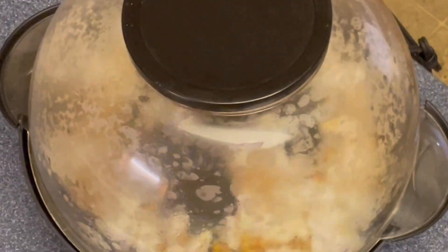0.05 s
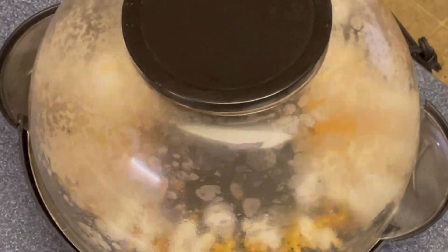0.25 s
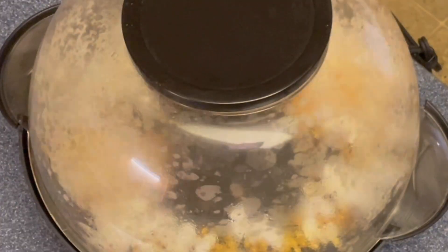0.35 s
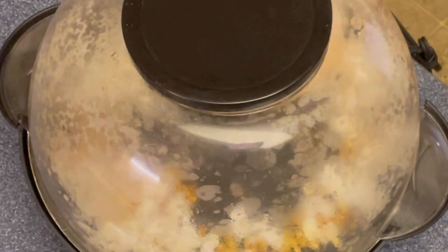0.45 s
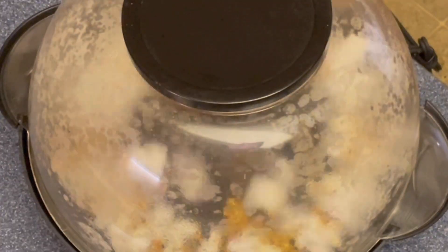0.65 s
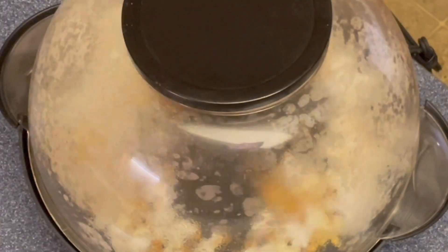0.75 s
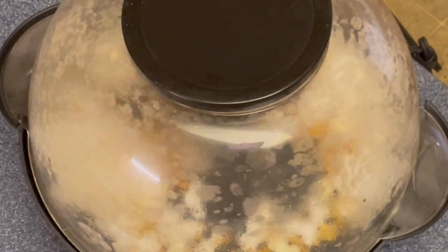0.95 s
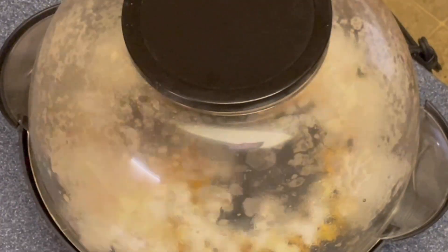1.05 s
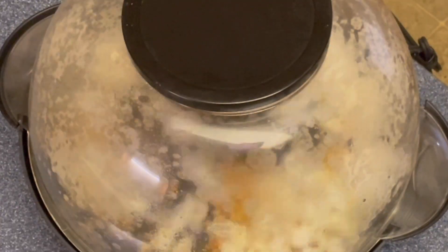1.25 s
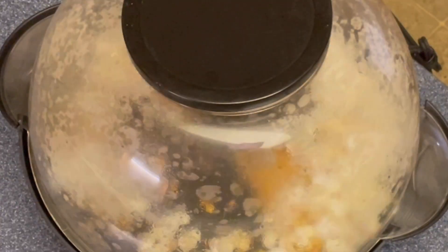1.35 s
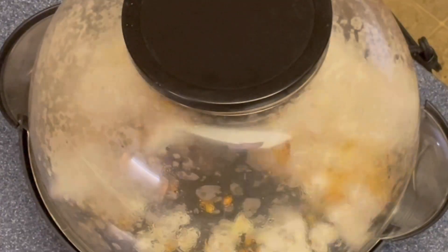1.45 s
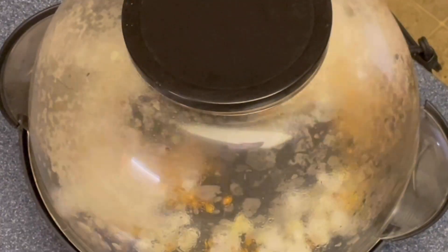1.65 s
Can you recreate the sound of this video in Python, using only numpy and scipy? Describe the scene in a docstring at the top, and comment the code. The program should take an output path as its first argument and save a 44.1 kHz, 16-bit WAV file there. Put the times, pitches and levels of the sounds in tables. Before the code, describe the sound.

Popcorn pops irregularly under a plastic dome, kernels clicking against it over a faint motor whir.

```python
"""Corn pops under the plastic dome of an electric popper, close by in a kitchen.
Each hull cracks, rings the pan and lets out a puff of steam that booms in the dome.
Flung kernels click and knock on the dome wall and set crumbs rattling.
Underneath, the stirring motor whirs and the oil sizzles faintly."""
import sys
import numpy as np
from scipy import signal
from scipy.fft import rfft, irfft
from scipy.io import wavfile
from scipy.ndimage import uniform_filter1d

SR = 44100
rng = np.random.default_rng(int(sys.argv[2]) if len(sys.argv) > 2 else 0)


def log_audio(samples):
    """Write samples as a 16-bit WAV file to the path given in sys.argv[1]."""
    # one column per channel
    frames = np.atleast_2d(samples).T
    # limit to full scale, then quantise
    limited = np.clip(frames, -1, 1)
    pcm = np.round(limited * 32767).astype(np.int16)
    wavfile.write(sys.argv[1], SR, pcm)


N = 74970

# bursting kernels: (time [s], crack [dB], pan ring [dB], puff [dB], puff pitch [Hz], thump [dB])
POP_CUES = [(0.2127, -32.5, -26.5, -12.5, 730, -29), (0.3941, -58, -63, -37, 940, -59),
            (0.4276, -22, -22.5, -31.5, 670, -40.5), (0.5506, -29.5, -34.5, -24, 665, -29.5),
            (0.6236, -58, -43, -27, 865, -34.5), (0.6443, -32.5, -28.5, -31, 820, -43),
            (0.821, -27, -37.5, -35.5, 734, -40.5), (1.1021, -32, -31.5, -40, 600, -55),
            (1.1177, -28, -28, -26, 623, -37), (1.2255, -46, -34, -33, 605, -34),
            (1.2446, -34, -38.5, -73, 600, -51), (1.2573, -26, -32, -34, 635, -33.5),
            (1.3779, -33, -43.5, -23.5, 520, -30), (1.6290, -42, -56, -47, 600, -56)]
# kernels striking the dome: (time [s], click [dB], knock [dB], knock pitch [Hz])
HIT_CUES = [(.0005, -45.5, -49, 2915), (.0283, -45.5, -55, 2950), (.2200, -17.5, -24, 2984),
            (.2222, -21, -26, 3240), (.2252, -25, -31, 2820), (.243, -36, -31.5, 3320),
            (.321, -37, -44, 3220), (.336, -34.5, -48, 3070), (.392, -48.5, -39.5, 2360),
            (.4688, -45.5, -38.5, 3090), (.576, -50.5, -39.5, 2600), (.6075, -49, -42, 3090),
            (0.6113, -49, -36.5, 2990), (0.6197, -63, -52, 3110), (.6372, -44.5, -72, 3000),
            (.6553, -31, -23, 3354), (.6605, -29, -57, 3100), (0.6969, -35, -31, 3195),
            (0.7093, -48, -34, 3314), (.8515, -50.5, -42, 3480), (1.2459, -39, -37.5, 3040),
            (1.2842, -26.5, -32, 3150), (1.2895, -55, -28, 3385), (1.3015, -66, -50, 3100),
            (1.3828, -26, -40, 3020), (1.405, -45, -37, 3140), (1.4148, -50, -28, 2548),
            (1.4212, -35, -30.5, 2573), (1.436, -53, -64, 2700), (1.459, -63, -68, 2680),
            (1.475, -44, -47, 3160), (1.489, -67, -67, 2950), (1.534, -55, -73, 3020),
            (1.579, -67, -88, 3020), (1.6300, -49, -46.5, 2860)]
# snap of a splitting hull: (frequency [Hz], gain [dB])
CRACK_EQ = [(100, -27), (500, 3.5), (1100, -4), (1600, -5.5), (2500, -3), (3500, -6.5), (6000, -7),
            (9000, -10), (13000, 2.5), (16000, -9)]
# broad tone of the pan: (frequency [Hz], gain [dB])
PAN_EQ = [(100, -37), (800, -11), (1600, -12.5), (2200, -1.5), (3400, -5.5), (6000, 0), (9000, -4),
          (13000, -10), (16000, -36)]
# ring of the pan under a crack: (frequency [Hz], lift [dB])
PAN_RING = [(2110, 14.5), (2840, 10.5), (4020, 9.5), (5272, 16.5), (6480, 13.5), (8130, 6), (8730, 3),
            (9830, 14), (11660, 17), (12060, -3), (13320, 4)]
# body that the dome gives a puff: (frequency [Hz], gain [dB])
PUFF_EQ = [(30, -33), (100, -22), (200, -3), (300, -0.5), (390, -11.5), (490, 1), (720, -7.5), (1020, 5.5),
           (1450, -6.5), (3000, -12)]
# resonances of the air under the dome: (frequency [Hz], level [dB], 60 dB decay time [s])
DOME_AIR = [(190, -7.5, 0.15), (282.3, -3.5, 0.22), (439, -5.5, 0.11), (514.3, 1.5, 0.13), (645, -2, 0.12),
            (810, -9, 0.029), (993, -40, 0.3), (1126, 5, 0.11), (1516, 5, 0.12)]
# bright edge of clicks and oil ticks: (frequency [Hz], gain [dB])
CLICK_EQ = [(100, -46), (500, -3), (1100, -6), (1700, -6.5), (2300, -3.5), (3000, 1), (4400, 4.5),
            (7500, 7.5), (10000, -0.5), (13000, -7), (16000, -33)]
# ring of the plastic wall: (frequency [Hz], lift [dB])
WALL_RING = [(2525, 14.5), (2840, 5.5), (2975, 13.5), (3082, 5.5), (3270, 11.5), (3620, 7.5), (3915, 6.5),
             (4160, 5.5), (4435, 2), (5100, 7), (5767, 6), (6450, -15), (7270, 3), (7850, 0.5), (8700, 1),
             (9600, 7), (10350, 4), (11900, 6), (13600, 22)]
# tone of a knock on the wall: (frequency [Hz], gain [dB])
KNOCK_EQ = [(100, -4), (1100, 11), (1500, -32.5), (2300, -3), (2560, 0), (3300, 2), (4200, -7.5),
            (9000, -11.5)]
# whir of the motor: (frequency [Hz], gain [dB])
WHIR_EQ = [(20, -24), (50, -86), (100, -12), (170, -3), (230, -13), (380, -9), (510, 1.5), (740, -0.5),
           (1130, 4.5), (1350, -6.5), (2000, -6.5), (3000, -13), (4500, -25.5), (7000, -17), (10000, -44.5),
           (14000, -27.5), (16000, -44)]
# hum of the motor: (frequency [Hz], level [dB])
MOTOR_TONES = [(180, -76.5), (285, -74.5), (620, -74.5), (965, -67.5), (1115, -62), (1160, -72),
               (1560, -70.5)]
# reverb of the kitchen: (frequency [Hz], 60 dB decay time [s])
ROOM_DECAY = [(150, 0.24), (530, 0.39), (1400, 0.29), (3500, 0.28), (8000, 0.17), (15000, 0.23)]
# likeness of left and right: (frequency [Hz], correlation [0-1])
STEREO_LIKENESS = [(50, 0.3), (300, 0.98), (1000, 0.41), (2500, 0.26), (8000, 0), (16000, 0.75)]

CRACK_PEAK_S, CLICK_PEAK_S, KNOCK_PEAK_S = 0.00083, 0.00057, 0.0012
PUFF_ECHO_S, PUFF_ECHO_GAIN = 0.00197, 0.12  # bounce off the top of the dome
GUST_SAG = 0.63  # pitch dives from this fraction above its centre to as far below
CRUMBS_PER_S, CRUMB_DECAY_S, CRUMB_DB = 760, 0.031, -16.5
KNOCK_RATTLE_RAD = 0.6
SIZZLE_PER_S, SIZZLE_DB, SIZZLE_SPREAD_DB = 240, -63.5, 2.5
ECHO_DRIFT_HZ = 4.5  # how fast the echoes drift between two patterns
RIGHT_LAG_S, HIGH_CUT_HZ = 0.00004, 16200


def hull_cracks():
    """Hulls split with a bright snap; those lying on the pan make it ring."""
    hull_snaps = snaps([(s, db) for s, db, *_ in POP_CUES], CRACK_PEAK_S)
    pan_snaps = snaps([(s, db) for s, _, db, *_ in POP_CUES], CRACK_PEAK_S)
    hull = equalise(hull_snaps, CRACK_EQ)
    pan = equalise(pan_snaps, PAN_EQ, PAN_RING, half_width_hz=69)
    return pan_left(reverb(hull + pan, early_db=-0.5, early_s=0.0051, room_db=-0.5), db=2.5)


def steam_puffs():
    """Steam escapes in a falling whoop and a low thump, and sets the air in the dome booming."""
    dry = np.zeros(N)
    for s, _, _, puff_db, hz, thump_db in POP_CUES:
        puff = amp(puff_db) * gust(hz, peak_s=0.002624, half_cycles=0.51)
        thump = amp(thump_db) * gust(hz=284, peak_s=0.004594, half_cycles=0.42)
        add(dry, s, puff + thump)
        add(dry, s + PUFF_ECHO_S, PUFF_ECHO_GAIN * puff)
    body = equalise(dry, PUFF_EQ) + amp(-49.5) * dome_boom(dry)
    return pan_left(reverb(body, early_db=-6.5, early_s=0.0041, room_db=-15.5), db=5)


def gust(hz, peak_s, half_cycles):
    """A few cycles of pressure that swell, fall in pitch and fade."""
    cycles = (np.arange(SR // 50) / SR - peak_s) * hz
    turns = cycles - GUST_SAG * np.log(np.cosh(cycles))
    return np.cos(2 * np.pi * turns) / np.cosh(np.pi / 2 * cycles / half_cycles)


def dome_boom(x):
    """The air under the dome rings on with a hollow tone."""
    t = np.arange(SR // 2) / SR
    ring = sum(amp(db - 60 * t / t60) * np.cos(2 * np.pi * hz * t) for hz, db, t60 in DOME_AIR)
    return convolve(x, ring)


def kernel_clicks():
    """Flung kernels click on the dome, scatter crumbs, ring its wall and stir the air inside."""
    contacts = snaps([(s, db) for s, db, *_ in HIT_CUES], CLICK_PEAK_S)
    t = np.arange(SR // 5) / SR
    crumbs = noise(len(t)) * (rng.random(len(t)) < CRUMBS_PER_S / SR) * np.exp(-t / CRUMB_DECAY_S)
    contacts = contacts + amp(CRUMB_DB) * convolve(contacts, crumbs)
    wall = equalise(contacts, CLICK_EQ, WALL_RING, half_width_hz=48.4)
    air = amp(-53.5) * dome_boom(contacts)
    return pan_left(reverb(wall + air, early_db=1, early_s=0.0064, room_db=0), db=1)


def kernel_knocks():
    """Each spot that is struck also gives a short, slightly rattling knock at its own pitch."""
    dry, envelope = np.zeros(N), transient(KNOCK_PEAK_S)
    t = np.arange(len(envelope)) / SR
    for s, _, db, hz in HIT_CUES:
        rattle = unit_rms(uniform_filter1d(rng.standard_normal(len(t)), size=40))
        add(dry, s, amp(db) * envelope * np.sin(2 * np.pi * hz * t + KNOCK_RATTLE_RAD * rattle))
    body = equalise(dry, KNOCK_EQ) + amp(-47.5) * dome_boom(dry)
    return pan_left(reverb(body, early_db=0.5, early_s=0.0077, room_db=-3.5), db=2)


def stirring_motor():
    """The stirrer lays down a bed of whir with faint wavering tones."""
    t, hum = np.arange(N) / SR, np.zeros(N)
    for hz, db in MOTOR_TONES:
        drift = 0.00499 * np.cumsum(rng.standard_normal(N))
        hum += amp(db) * np.sqrt(2) * np.cos(2 * np.pi * (hz * t + drift))
    whir = amp(-53.5) * unit_rms(equalise(noise(N), WHIR_EQ))
    return pan_left(whir + hum, db=4)


def oil_sizzle():
    """Faint, blurred ticking of hot oil and shifting kernels."""
    sizes = amp(SIZZLE_SPREAD_DB * np.minimum(rng.exponential(1, N), 3))
    spikes = noise(N) * sizes * (rng.random(N) < SIZZLE_PER_S / SR)
    ticks = equalise(spikes, CLICK_EQ)
    return amp(SIZZLE_DB) * unit_rms(reverb(ticks, early_db=-19, early_s=0.0023, room_db=5))


def reverb(x, early_db, early_s, room_db):
    """Adds echoes that drift between two patterns, so that no two pops ring alike."""
    turn = 2 * np.pi * ECHO_DRIFT_HZ * np.arange(N) / SR
    sends = (np.cos(turn), np.sin(turn))
    return x + sum(convolve(x * send, echoes(early_db, early_s, room_db)) for send in sends)


def echoes(early_db, early_s, room_db):
    """Quick reflections inside the dome, decaying over early_s, and the tail of the kitchen."""
    hz, frame_s, spectrum = signal.stft(noise(SR // 2), SR, nperseg=256)
    decay = amp(-60 * frame_s / curve(ROOM_DECAY, hz)[:, None])
    tail = signal.istft(spectrum * decay, SR, nperseg=256)[1]
    t = np.arange(tail.shape[1]) / SR
    tail *= 1 - np.exp(-t / 0.0035)  # soft onset
    early = noise(len(t)) * np.exp(-t / early_s) * (1 - np.exp(-t / 0.0021))
    early = amp(early_db) * early / np.linalg.norm(early[0])
    return early + amp(room_db) * tail / np.linalg.norm(tail[0])


def snaps(cues, peak_s):
    """A very short spray of fractures or contacts for each (time [s], level [dB])."""
    track, envelope = np.zeros((2, N)), transient(peak_s)
    for s, db in cues:
        add(track, s, amp(db) * envelope * noise(len(envelope)))
    return track


def transient(peak_s):
    """Envelope that swells to one and dies quickly."""
    u = np.arange(SR // 50) / SR / peak_s
    return u * np.exp(1 - u)


def noise(count):
    """Stereo white noise, nearly mono in the low mids and wide in the treble."""
    left, other = rfft(rng.standard_normal((2, count)))
    likeness = np.clip(curve(STEREO_LIKENESS, np.fft.rfftfreq(count, 1 / SR)), 0, 1)
    right = likeness * left + np.sqrt(1 - likeness ** 2) * other
    return irfft(np.array([left, right]), count)


def equalise(x, points, modes=(), half_width_hz=1):
    """Minimum-phase EQ: a broad curve with narrow peaks and dips on it."""
    hz = abs(np.fft.fftfreq(4096, 1 / SR))
    db = curve(points, hz) + sum(lift / (1 + ((hz - f) / half_width_hz) ** 2) for f, lift in modes)
    spectrum = np.exp(np.conj(signal.hilbert(np.log(amp(db)))))
    return convolve(x, np.fft.ifft(spectrum).real)


def curve(points, hz):
    """Reads a table on a log-frequency axis."""
    f, value = np.transpose(points)
    return np.interp(np.log(hz + 1), np.log(f), value)


def convolve(x, response):
    """Convolves channel by channel."""
    return signal.fftconvolve(np.atleast_2d(x), np.atleast_2d(response), axes=1)[:, :N]


def pan_left(x, db):
    """Tips the balance to the left by db."""
    return x * amp([[db / 2], [-db / 2]])


def add(mix, s, sound):
    """Mixes a sound in at s seconds."""
    part = mix[..., max(round(s * SR), 0):][..., :sound.shape[-1]]
    part += sound[..., :part.shape[-1]]


def amp(db):
    """Decibels to gain."""
    return 10 ** (np.asarray(db) / 20)


def unit_rms(x):
    """Scales to an rms of one."""
    return x / np.sqrt(np.mean(x ** 2) + 1e-20)


def scene():
    """Pops and clatter over motor and oil, with the popper a little to the left."""
    popping = hull_cracks() + steam_puffs() + kernel_clicks() + kernel_knocks()
    left, right = popping + stirring_motor() + oil_sizzle()
    delay = np.exp(-2j * np.pi * np.fft.rfftfreq(N, 1 / SR) * RIGHT_LAG_S)
    return np.array([left, irfft(rfft(right) * delay, N)])


def record(dry):
    """A steep high cut trims the very top of the mix."""
    lowpass = signal.firwin(401, HIGH_CUT_HZ, window=("kaiser", 9), fs=SR)
    return signal.oaconvolve(dry, lowpass[None], "same")


dry = scene()
out = record(dry)
log_audio(out)
```